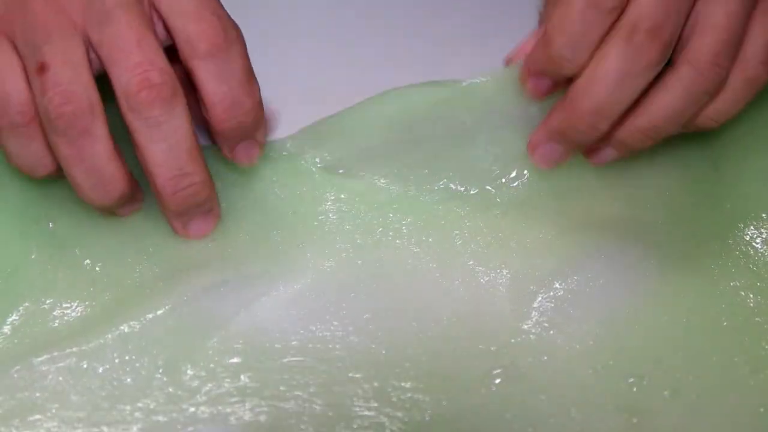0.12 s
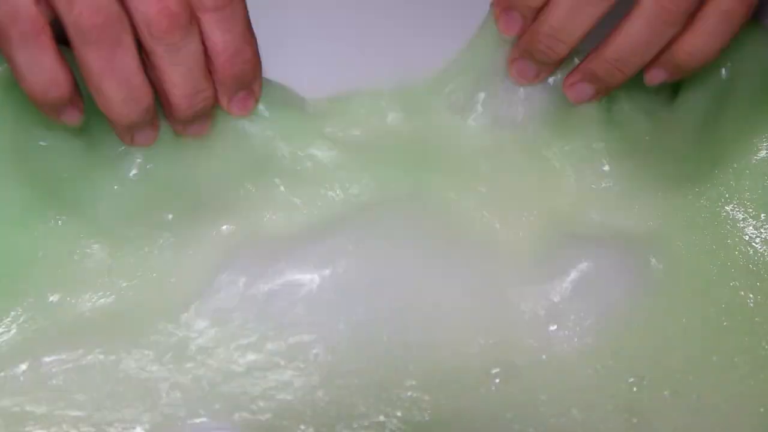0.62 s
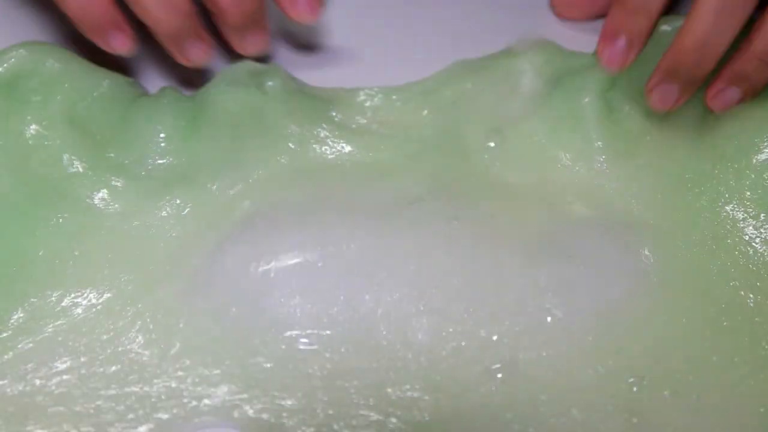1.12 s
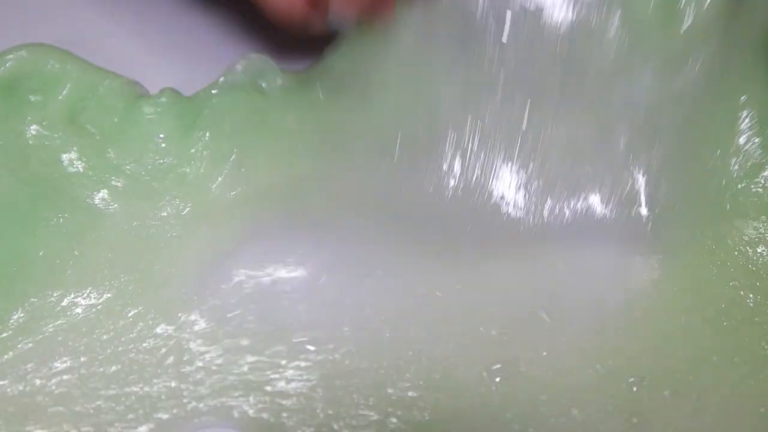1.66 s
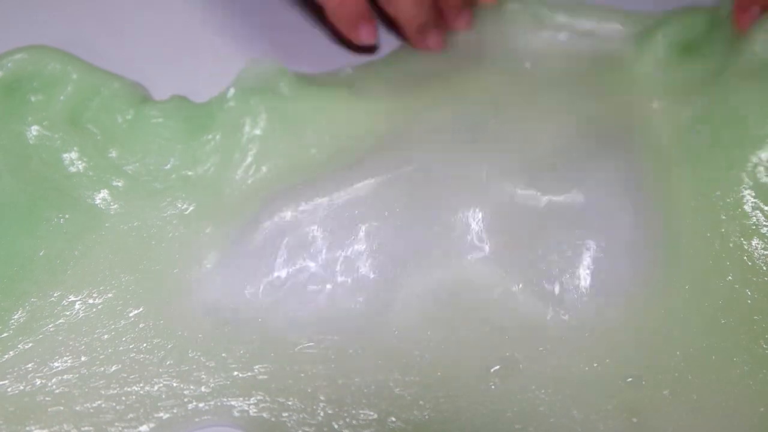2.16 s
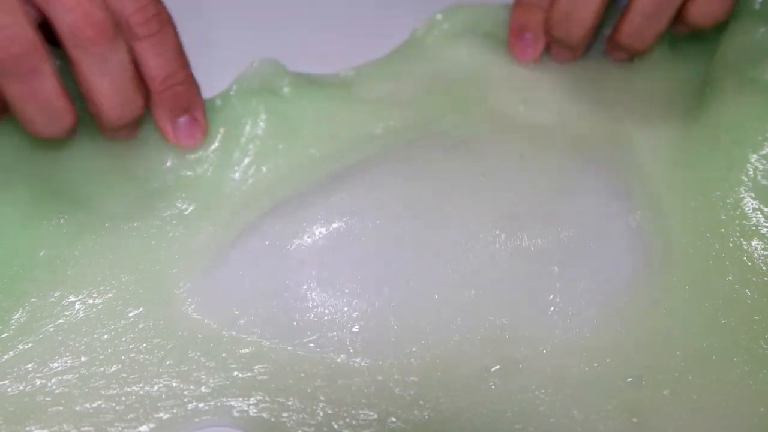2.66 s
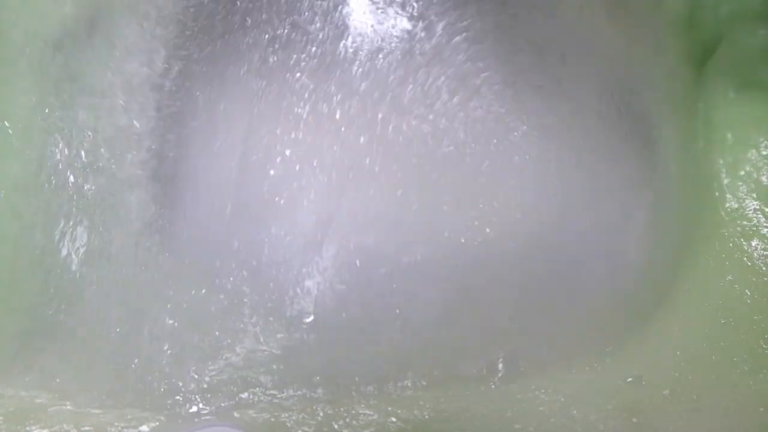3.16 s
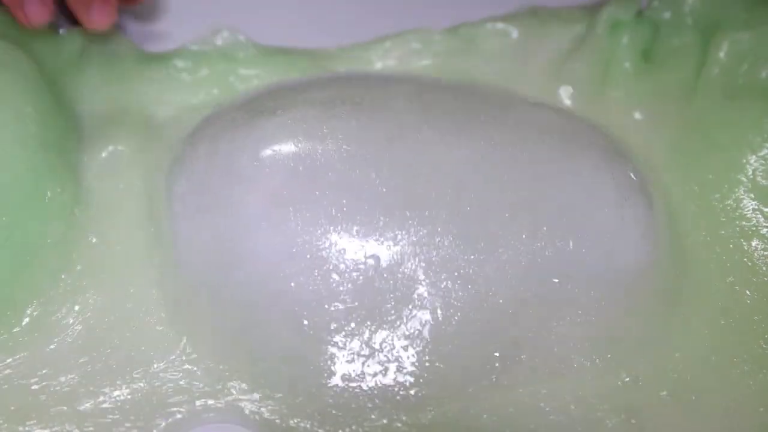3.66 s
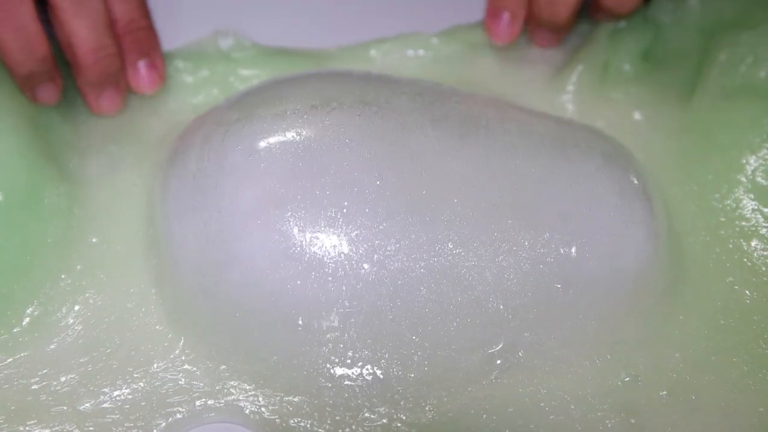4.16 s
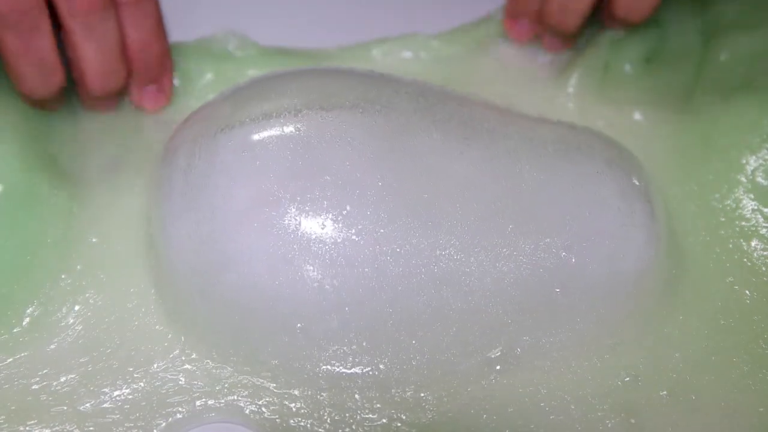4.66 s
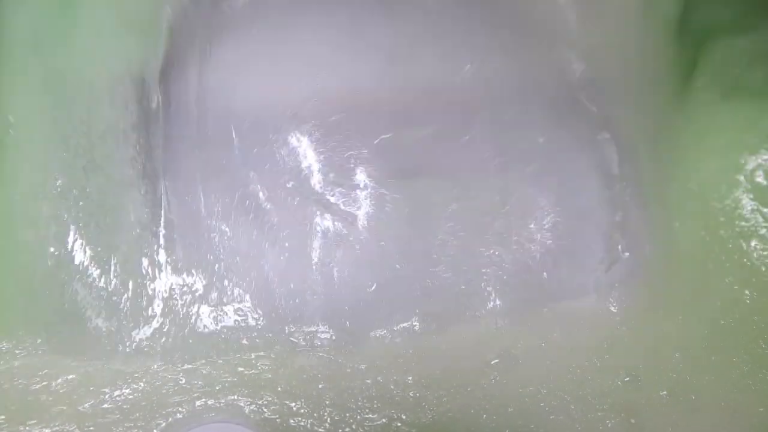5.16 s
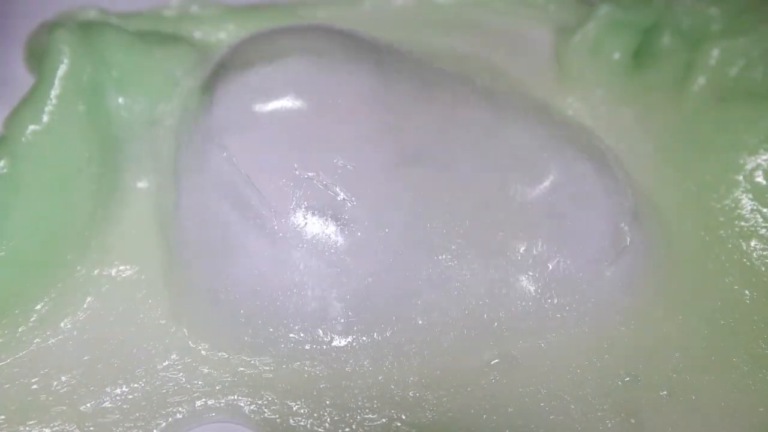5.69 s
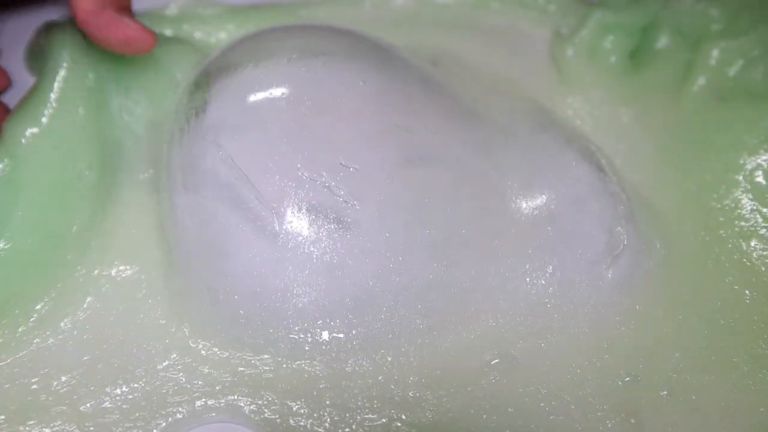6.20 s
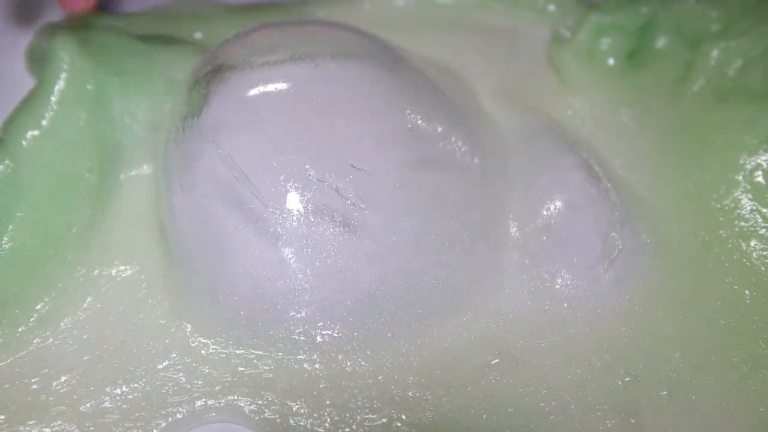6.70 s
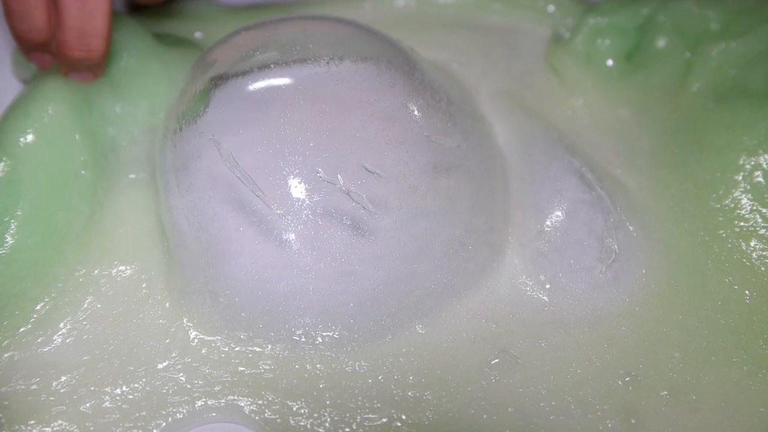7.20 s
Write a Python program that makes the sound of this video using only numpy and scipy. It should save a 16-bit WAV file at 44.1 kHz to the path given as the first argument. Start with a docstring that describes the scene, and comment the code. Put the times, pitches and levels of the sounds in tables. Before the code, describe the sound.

Hands lift and slap glossy slime on a table, very close to a stereo microphone. A hugely loud, slightly overloaded pop comes early, then wet double snaps, a softer crackling cluster midway, and another sharp group of pops later. Between them are only faint sticky ticks and rustle. A small bare room answers briefly over steady hiss and low hum.

```python
"""A small bare room: sticky slime is lifted, stretched and slapped down on a table, close to a stereo
microphone. Trapped air pockets burst and ring a few cycles behind a brighter snap of skin; bright ticks are
faint snaps of the film and loud cracks within the slaps; landings thump dully, peeling fingers crackle in
strings of small bursts, and sparse resonant grains rustle. Decaying noise gives the room's answer; steady noise
and wavering sines give hiss and hum."""
import sys
import numpy as np
from scipy import signal
from scipy.io import wavfile

SR = 44100
rng = np.random.default_rng(int(sys.argv[2]) if len(sys.argv) > 2 else 0)


def output_pcm(signal):
    """Save a mono or channel-first signal as 16-bit PCM at the path in sys.argv[1].

    Samples are clipped to [-1, 1] before scaling.
    """
    pcm = np.clip(np.atleast_2d(signal).T, -1, 1) * 32767
    wavfile.write(sys.argv[1], SR, np.round(pcm).astype(np.int16))


def undo_db(level):
    """Turn decibels back into plain size, where 20 dB means ten times bigger."""
    steps = np.asarray(level, float) / 20
    return 10 ** steps


N = 322812  # samples

POCKET_PAN_DB, POCKET_SCATTER_DB = 0.75, 1.3  # left-right place of the sheet, spread of pockets about it


def add_burst(out, start_s, level_db, hz, cycles, pan_db, sag=0):
    """One burst: a quick smooth rise, then a dying ring whose pitch may sag."""
    rise_cycles = 0.56
    turns = np.arange(int(4 * cycles * SR / hz) + 8) * hz / SR
    rise = np.sin(np.pi / 2 * np.minimum(turns / rise_cycles, 1)) ** 2
    decay = np.exp(-(turns / cycles) ** 1.53)
    wave = -np.sin(2 * np.pi * turns * (1 - sag * turns / cycles)) * decay * rise
    start = int(start_s * SR)
    gains = undo_db(level_db + pan_db * np.array([[.5], [-.5]]))
    piece = gains * wave[:max(N - start, 0)]
    out[:, start:start + piece.shape[1]] += piece


def pockets():
    """Bursting air pockets: a ring, sagging as the soft wall damps it, under the snap and crack of torn skin."""
    # (time [s], level [dB], pitch [Hz], ring [cycles], skin re ring [dB])
    bursts = [(0.3799, -40.5, 1020, 2.8, 5), (0.6736, -23, 1900, 4.4, -3), (0.6835, -1.5, 1000, 0.84, -11),
              (0.6932, 6, 1490, 2.9, -38), (0.967, -19.5, 716, 1.8, -1), (0.9797, -12, 568, 3.5, 4),
              (0.9818, -8.5, 535, 2.5, -26), (1.0995, -33, 560, 2.2, 7), (1.514, -30, 1900, 1.36, 4),
              (1.8765, -35, 1270, 2.1, -15), (1.912, -14, 643, 6.4, -15), (1.9205, -8.5, 549, 3.14, -1.5),
              (1.924, -19.5, 544, 1.8, 14.5), (1.937, -15.5, 1380, 2.5, -19), (2.029, -30.5, 702, 13, -4),
              (2.0332, -20.5, 1650, 2.7, -32), (2.048, -35.5, 750, 11.4, 4), (2.074, -40, 1000, 10, -1),
              (2.207, -5.5, 1860, 1.06, -15), (2.2095, -8.5, 648, 2.26, -5), (2.2289, -25, 1150, 3.9, 2),
              (2.342, -30.5, 558, 4.6, 3), (2.89, -40.5, 1080, 2.4, -11), (2.905, -40, 1180, 2.4, -8),
              (2.919, -33, 1440, 1.6, -12), (3.088, -39, 1450, 3.2, -1), (3.137, -40.5, 720, 1.6, 7),
              (3.254, -40, 2010, 2.3, -5), (3.2746, -23, 480, 1.7, -14), (3.289, -24, 460, 3.1, 6),
              (3.3001, -15.5, 468, 3.3, 2), (3.302, -20.5, 1390, 6, -12), (3.325, -26.5, 700, 5.1, -5),
              (3.31, -17.5, 1910, 5, -13), (3.344, -22, 2000, 3.2, -5), (3.346, -26.5, 493, 3.7, -17),
              (3.355, -18.5, 1330, 2.2, -7), (3.373, -23, 1660, 1.7, -12), (3.399, -30.5, 905, 2.1, -11),
              (3.4668, -27.5, 481, 3.7, 3.5), (3.5008, -38.5, 496, 1.7, 11.5), (4.004, -41, 1300, 1.8, -5),
              (5.018, -38, 810, 1.3, -1.5), (5.083, -27, 2540, 4.9, -15), (5.0849, -17, 1300, 1.1, -19),
              (5.126, -21, 890, 0.86, 0), (5.2445, -40, 1300, 1.7, -4), (5.275, -12.5, 1600, 1.7, -17),
              (5.2865, -14.5, 617, 3.8, -1.5), (5.2945, -12, 644, 4.1, -4.5), (5.296, -20, 4220, 11, -40),
              (5.392, -27.5, 625, 4.1, -3), (5.452, -36.5, 1560, 4.5, -13), (6.085, -39, 354, 1.5, -7.5),
              (7.053, -39.5, 1170, 3.5, -10), (7.096, -38, 1085, 1.8, -13), (7.1038, -36.5, 1530, 2.9, -13),
              (7.176, -37, 740, 2.2, 10.5), (7.188, -39, 1360, 3.2, -7.5)]
    skin_ratio, skin_cycles = 3.4, 0.95
    crack_ratio, crack_cycles, crack_re_skin_db = 6.5, 0.623, -1
    out = np.zeros((2, N))
    for s, db, hz, cycles, skin_db in bursts:
        pan_db = POCKET_PAN_DB + POCKET_SCATTER_DB * rng.standard_normal()
        add_burst(out, s, db, hz, cycles, pan_db, sag=.03)
        add_burst(out, s, db + skin_db, hz * skin_ratio, skin_cycles, pan_db)
        crack_db = db + skin_db + crack_re_skin_db
        add_burst(out, s, crack_db, hz * crack_ratio, crack_cycles, 3.0 * pan_db)
    return out


def ticks():
    """Faint snaps of the film and loud cracks within the slaps, as bare rings: the louder, the shorter."""
    # bright ticks: (time [s], level [dB], pitch [Hz], left-right [dB])
    snaps = [(0.3176, -46.5, 8963, -2.5), (0.4236, -30.5, 6900, -1.3), (0.6931, 8.5, 4500, -12),
             (0.6936, -11, 10110, 12), (0.7001, -11, 3040, 6), (0.979, -9.5, 3900, 2),
             (0.9815, -15.5, 3700, 6.5), (0.982, -17.5, 7770, -16), (1.5156, -27, 10520, -6),
             (1.6447, -40, 10560, -24), (1.9123, -13.5, 4030, -5), (1.913, -10, 6900, -7),
             (1.916, -11, 6900, -14), (1.9239, -18.5, 5600, -1), (2.2084, -18.5, 4500, 8.5),
             (2.2085, -14.5, 8600, -4.5), (2.7516, -28, 13900, -8), (2.9436, -41, 13000, 5.7),
             (3.2746, -17, 7000, -5), (3.2748, -27, 3080, -16), (3.292, -16.5, 8300, -1),
             (4.6731, -42, 6720, -8.5), (5.0826, -37, 8850, -6), (5.1283, -27, 6100, 1.5),
             (5.245, -35, 6340, -9), (5.2759, -16.5, 6560, -18), (5.2775, -9, 7000, 0),
             (5.2953, -6.5, 4344, 11), (7.0033, -42.5, 6879, 15), (7.054, -34, 7628, 12),
             (7.0752, -37, 6840, 16), (7.1127, -37.5, 9743, -8), (7.1633, -29, 7100, 12),
             (7.1765, -31, 5410, 8), (7.2311, -42, 13000, 15.5)]
    faint_db, faint_cycles, db_per_halved_ring = -35, 2.3, 27.5
    out = np.zeros((2, N))
    for s, db, hz, pan_db in snaps:
        cycles = faint_cycles * 2 ** ((faint_db - db) / db_per_halved_ring)
        add_burst(out, s, db, hz, cycles, pan_db)
    return out


def thumps():
    """The sheet or a hand landing on the table: a dull, centred, strongly damped ring."""
    # (time [s], level [dB], pitch [Hz])
    landings = [(0.979, -37, 186), (1.914, -33.5, 198), (2.21, -28.5, 150), (3.285, -42, 130),
                (5.283, -40, 111), (5.292, -16, 406), (6.08, -48.5, 281), (7.179, -37.5, 340)]
    out = np.zeros((2, N))
    for s, db, hz in landings:
        add_burst(out, s, db, hz, cycles=1.23, pan_db=0)
    return out


def peeling():
    """Sticky peeling: dense strings of little bursts of uneven size and pitch, swelling and fading."""
    # (start [s], length [s], level [dB], bright bursts re dull [dB])
    runs = [(0.391, .08, -53.5, 0), (0.675, .03, -26.5, 0), (0.981, .024, -29, -7), (1.458, .04, -55.5, 2),
            (1.911, .016, -20, -7), (2.205, .025, -30.5, -4), (2.609, .08, -54, 8.5), (2.866, .11, -54, 0),
            (3.249, .027, -48, 7.5), (3.274, .06, -31, 2.5), (5.013, .082, -50.5, 5),
            (5.086, .03, -42.5, -5.5), (5.262, .011, -38, -3), (5.274, .03, -27.5, 5),
            (5.301, .037, -36, -2), (6.07, .053, -62, -5), (7.03, .05, -55, 2), (7.174, .036, -52, 9.5)]
    bursts_per_s, dull_hz, bright_low_hz = 2400, 1450, 2500
    out = np.zeros((2, N))
    for start_s, length_s, db, bright_db in runs:
        count = int(bursts_per_s * length_s) + 3
        for place, size, pitch, kind, side in rng.random((count, 5)):
            s = start_s + place * length_s
            swell_db = 20 * np.log10(np.sin(np.pi * place ** 0.54) + .4)
            size_db = db + swell_db - 2.0 * np.log(size + .05)
            if kind < .5:
                hz = dull_hz * 2 ** (1.3 * pitch - .65)
                add_burst(out, s, size_db, hz, 1.6, 6.1 * (side - .5))
            else:
                hz = bright_low_hz * 2 ** (2.4 * pitch)
                add_burst(out, s, size_db + bright_db - 11.0 * pitch, hz, 1.5, 24 * (side - .5))
    return out


def rms_one(x):
    """Scale to rms 1."""
    return x / np.sqrt(np.mean(x ** 2) + 1e-20)


def rustle():
    """Faint wet rustle of busy hands: sparse random grains, each dealt to one of 12 short resonances."""
    # (time [s], level [dB])
    activity = [(0, -64.5), (.6, -62.5), (2.6, -63), (3.1, -60), (3.7, -67), (4.7, -63), (4.95, -61.5),
                (5.6, -66.5), (6.95, -73.5), (7.1, -61), (7.32, -61)]
    grains_per_s, resonances = 1500, 12
    s, db = np.transpose(activity)
    grains = undo_db(3.0 * np.minimum(rng.exponential(1, N), 5)) * (rng.random(N) < grains_per_s / SR)
    dealt = rng.integers(0, resonances, N)
    out = np.zeros(N)
    for k, hz in enumerate(np.geomspace(500, 6000, resonances)):
        radius = np.exp(-hz / (1.3 * SR))
        angle = 2 * np.pi * hz / SR
        poles = [1, -2 * radius * np.cos(angle), radius * radius]
        out += signal.lfilter([0, np.sin(angle)], poles, grains * (dealt == k) + 1e-18)
    return undo_db(np.interp(np.arange(N) / SR, s, db)) * rms_one(out)


def at_hz(points, hz, axis=1):
    """Read a column of a table at a frequency, on a log axis."""
    points = np.array(points)
    return np.interp(np.log(hz), np.log(points[:, 0]), points[:, axis])


def noise_bands(size):
    """Half-octave bands of noise: yields centre in Hz, a shared and an opposed part."""
    white = rng.standard_normal((2, 2, size))  # neighbouring bands take different noise
    edges_hz = 20 * 2 ** np.arange(0, 10.1, .5)
    for k, (low, high) in enumerate(zip(edges_hz, edges_hz[1:])):
        sos = signal.butter(2, [low, min(high, .45 * SR)], "band", fs=SR, output="sos")
        shared, opposed = signal.sosfilt(sos, white[k % 2])
        yield np.sqrt(low * high), shared, opposed


def spread(shared, opposed, likeness):
    """Two channels with a given likeness."""
    likeness = np.clip(likeness, 0, 1)
    return np.sqrt(1 + likeness) * shared + np.sqrt(1 - likeness) * opposed * [[1], [-1]]


def room(x):
    """Dense reflections from the first wall on, as noise dying band by band."""
    # (frequency [Hz], t60 [s], relative level [dB], left-right likeness [0-1])
    bands = [(150, 0.46, -5.5, 0.7), (400, .41, -0.5, 1), (1000, 0.44, -3, 0.9), (2530, 0.42, -0.5, 0.11),
             (7000, 0.43, -0.5, 0.053), (13400, 0.36, 9.5, .05)]
    room_db, first_wall_s = 2, .006
    t = np.arange(SR // 2) / SR
    echo = 0
    for hz, shared, opposed in noise_bands(len(t)):
        level_db = at_hz(bands, hz, axis=2) - 60 * t / at_hz(bands, hz)
        echo = echo + undo_db(level_db) * spread(shared, opposed, at_hz(bands, hz, axis=3))
    since_wall_s = t - first_wall_s
    echo = echo * (1 + .9 * np.exp(-since_wall_s / .012))  # nearest surfaces answer strongest
    echo = echo * np.clip(since_wall_s / 0.0015, 0, 1)
    echo = undo_db(room_db) * echo / np.sqrt(np.sum(echo ** 2) / 2)
    return signal.fftconvolve(x[None], echo, axes=1)[:, :N]


def hiss():
    """Steady hiss of room and microphone: noise shaped and spread band by band."""
    # (frequency [Hz], relative density [dB])
    spectrum = [(25, -14.5), (40, -37.5), (80, -11.5), (150, -11), (250, -5.5), (500, -5), (1000, -5.5),
                (2000, -7.5), (4000, -11.5), (8000, -16), (12000, -20.5), (16000, -28.5)]
    # (frequency [Hz], left-right likeness [0-1])
    likeness = [(40, 0.43), (200, 0.44), (600, 0.14), (1500, 0.17), (4000, 0.037)]
    hiss_db = -55
    out = np.zeros((2, N))
    for hz, shared, opposed in noise_bands(N):
        out += undo_db(at_hz(spectrum, hz)) * spread(shared, opposed, at_hz(likeness, hz))
    return undo_db(hiss_db) * rms_one(out)


def hum():
    """Hum: centred sine lines whose phases wander slightly."""
    # (frequency [Hz], rms level [dB])
    lines = [(58.3, -74.5), (122, -69), (264.6, -73.5), (197, -77)]
    t = np.arange(N) / SR
    out = np.zeros(N)
    for hz, db in lines:
        waver_rad = np.cumsum(rng.standard_normal(N)) * 0.0043
        out += np.sqrt(2) * undo_db(db) * np.sin(2 * np.pi * hz * t + waver_rad)
    return out


def scene():
    """Slime, its echo and the background; little bass leaves so small a source."""
    radiation_low_hz = 91
    slime = pockets() + ticks() + thumps() + peeling() + rustle()
    slime = signal.sosfilt(signal.butter(2, radiation_low_hz, "high", fs=SR, output="sos"), slime)
    return slime + room(slime.mean(axis=0)) + hiss() + hum()


def roll_off(x):
    """The treble ends steeply here."""
    return signal.sosfilt(signal.butter(12, 16350, fs=SR, output="sos"), x)


def record(dry):
    """The loudest burst overloads the input, whose coupling drops the deepest bass."""
    overloaded = np.clip(dry, -1.05, 1.05)
    coupled = signal.sosfilt(signal.butter(1, 45, "high", fs=SR, output="sos"), overloaded)
    return roll_off(np.clip(coupled, -1, 1))


dry = scene()
out = record(dry)
output_pcm(out)
```